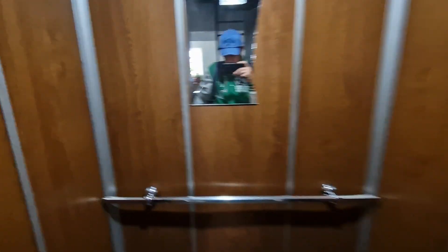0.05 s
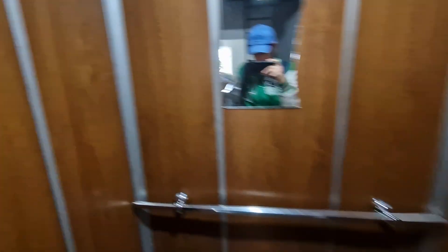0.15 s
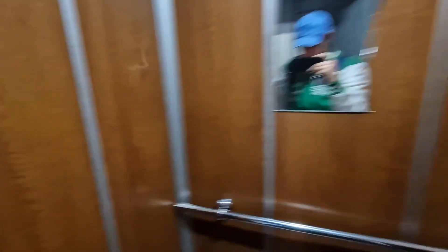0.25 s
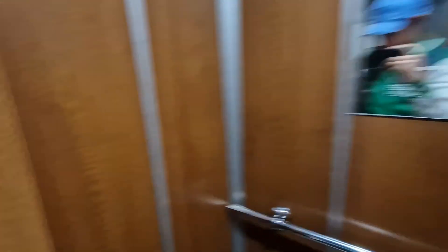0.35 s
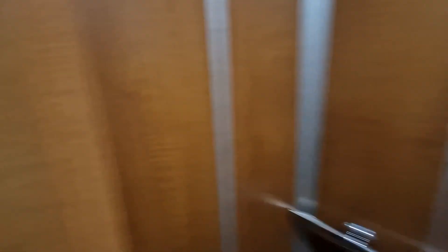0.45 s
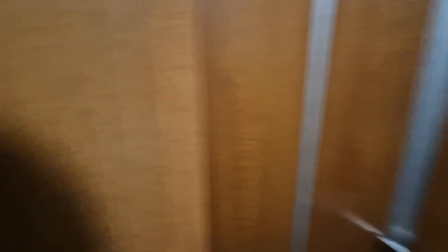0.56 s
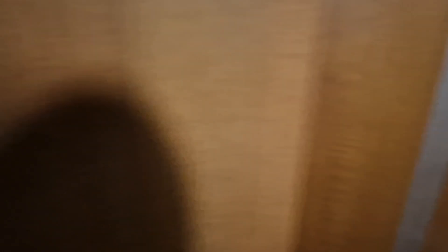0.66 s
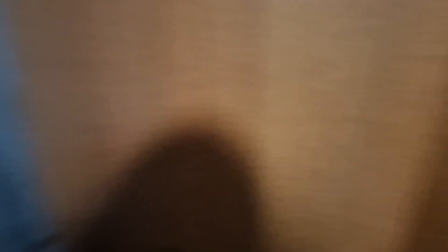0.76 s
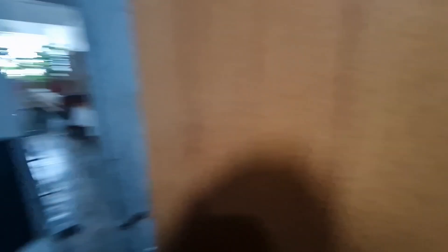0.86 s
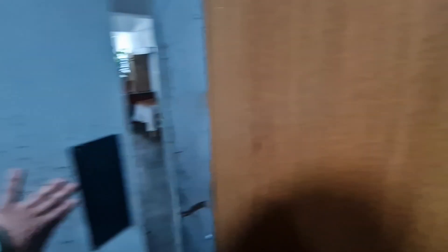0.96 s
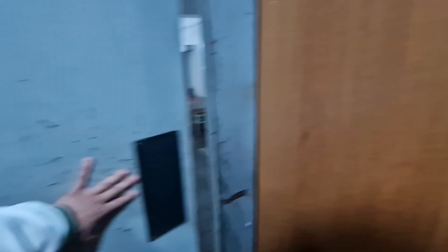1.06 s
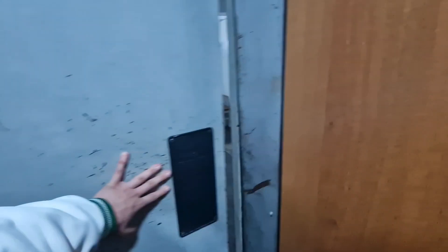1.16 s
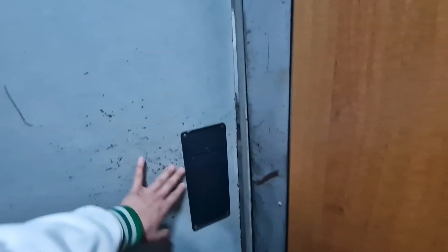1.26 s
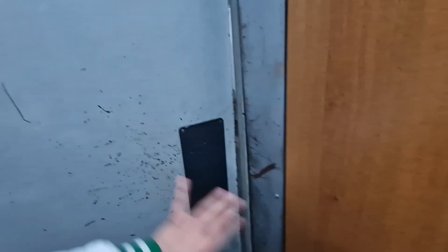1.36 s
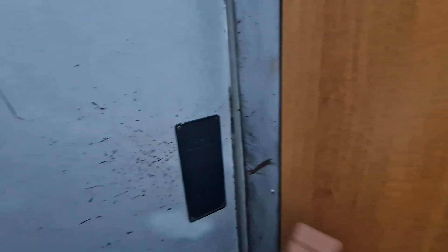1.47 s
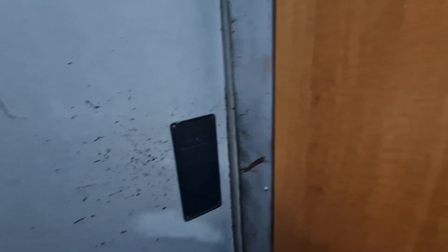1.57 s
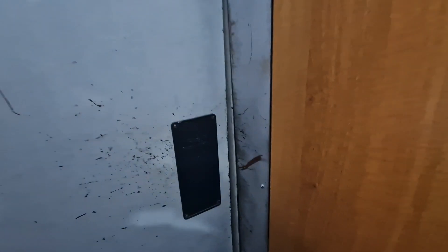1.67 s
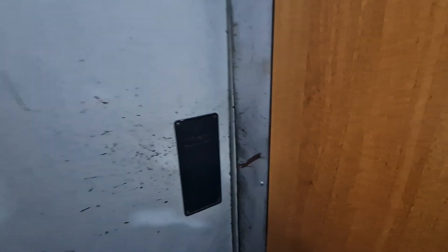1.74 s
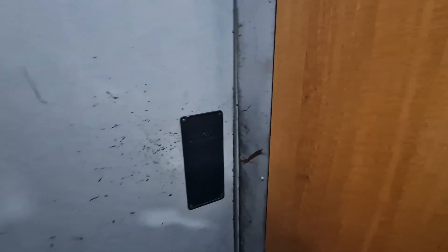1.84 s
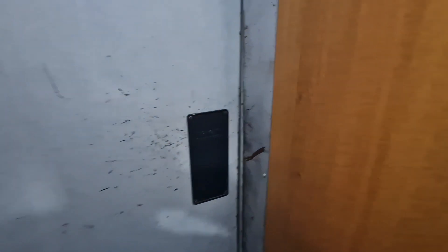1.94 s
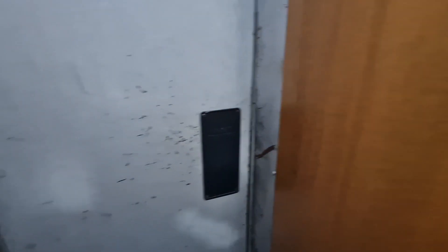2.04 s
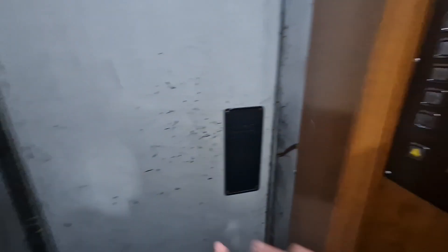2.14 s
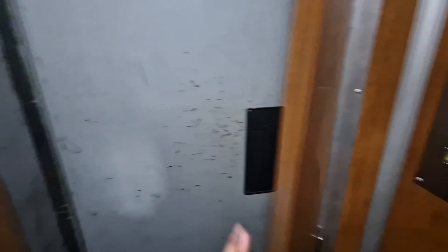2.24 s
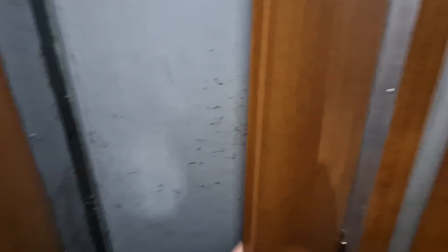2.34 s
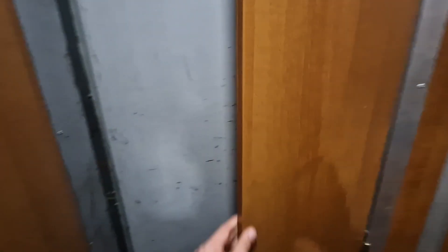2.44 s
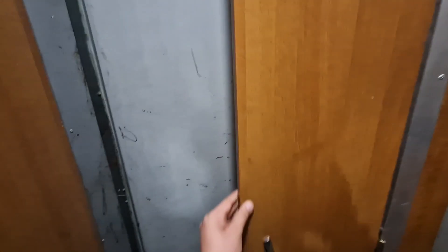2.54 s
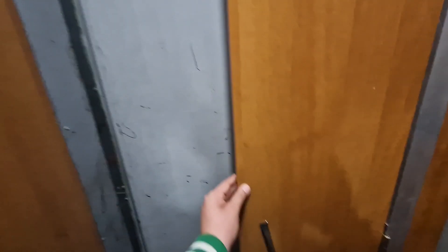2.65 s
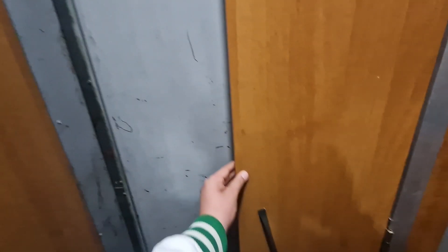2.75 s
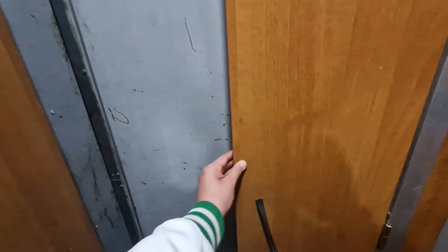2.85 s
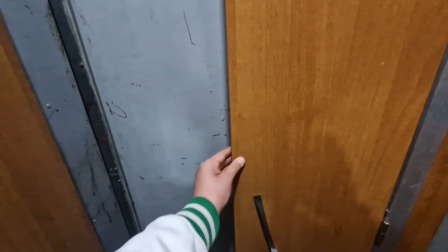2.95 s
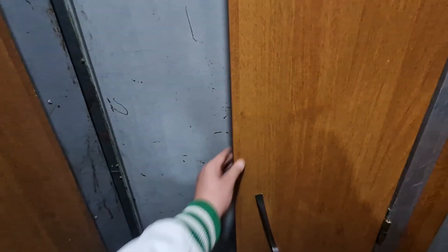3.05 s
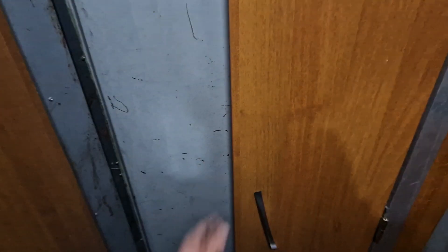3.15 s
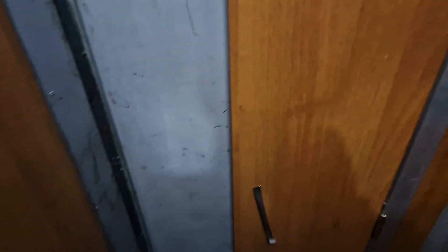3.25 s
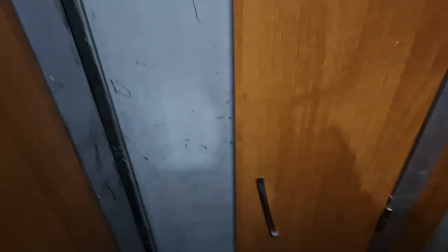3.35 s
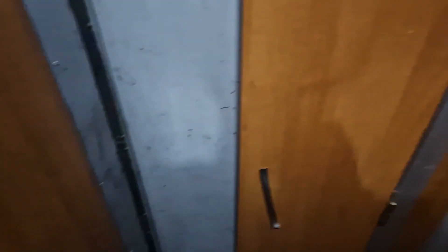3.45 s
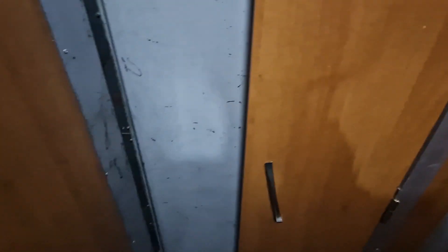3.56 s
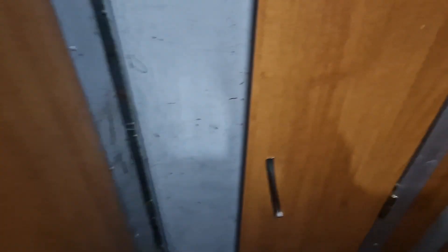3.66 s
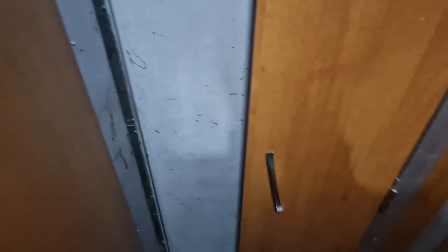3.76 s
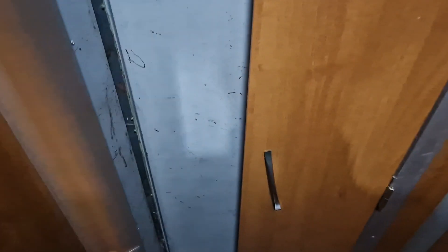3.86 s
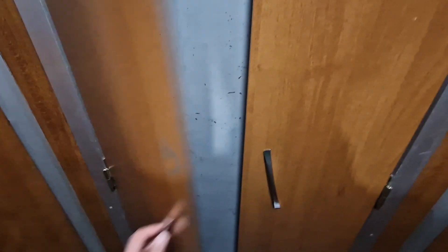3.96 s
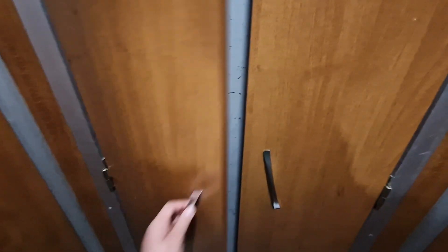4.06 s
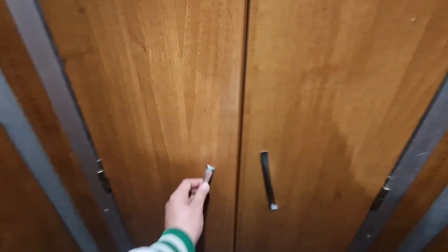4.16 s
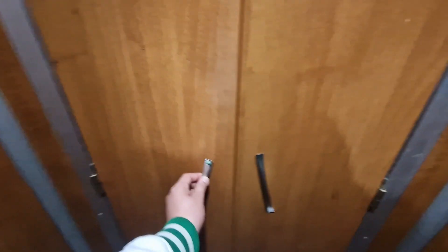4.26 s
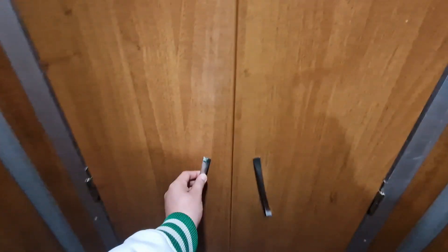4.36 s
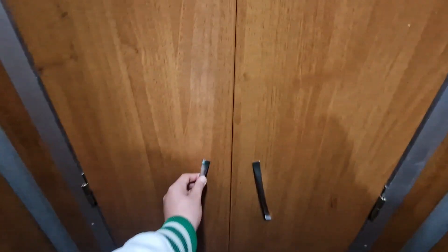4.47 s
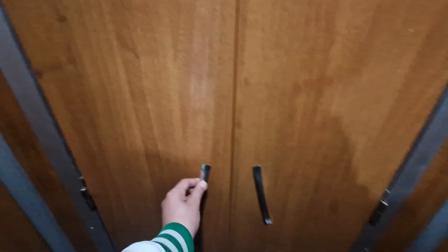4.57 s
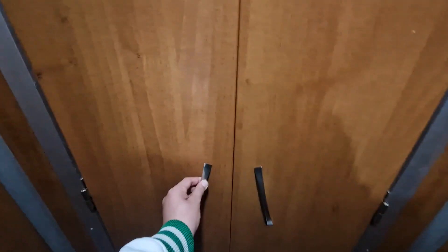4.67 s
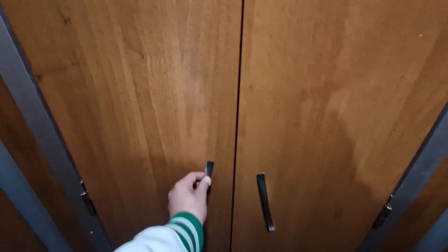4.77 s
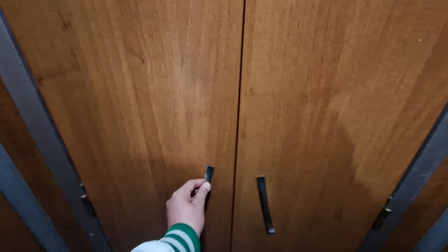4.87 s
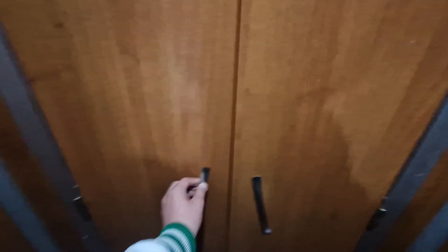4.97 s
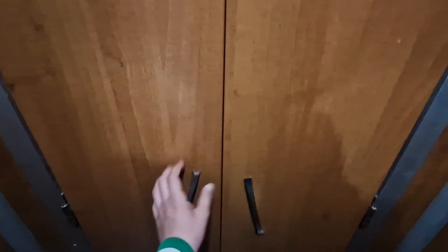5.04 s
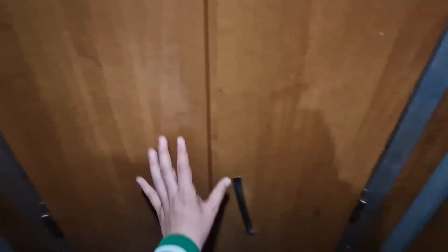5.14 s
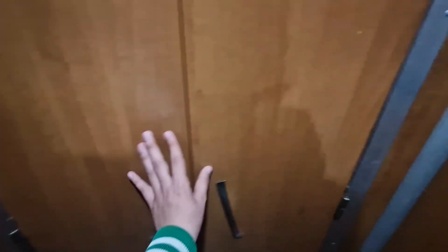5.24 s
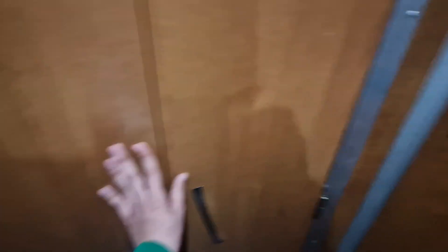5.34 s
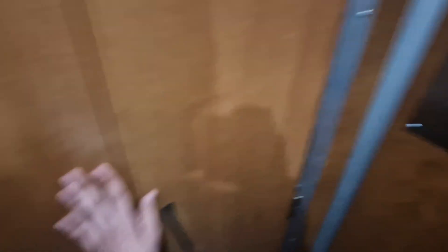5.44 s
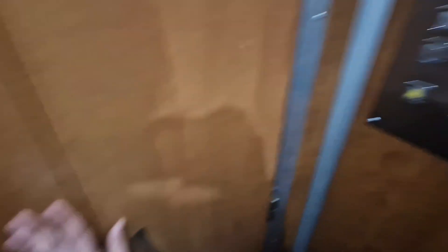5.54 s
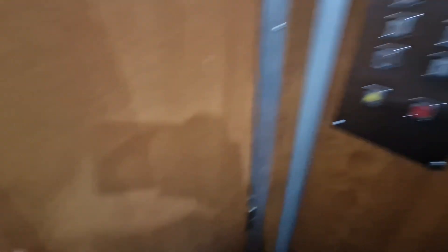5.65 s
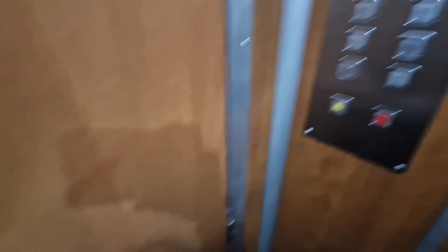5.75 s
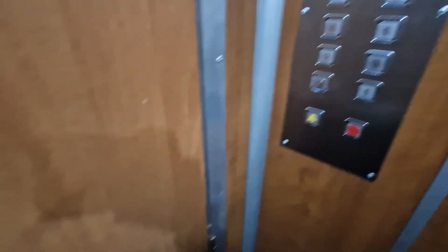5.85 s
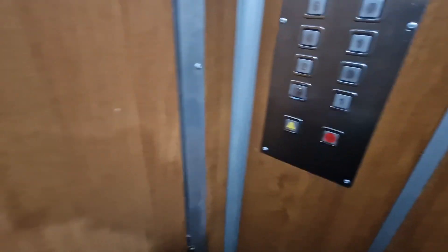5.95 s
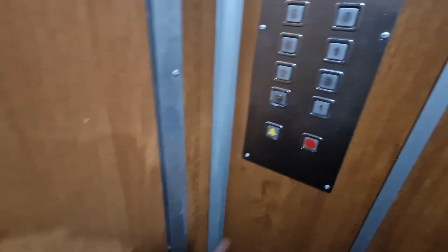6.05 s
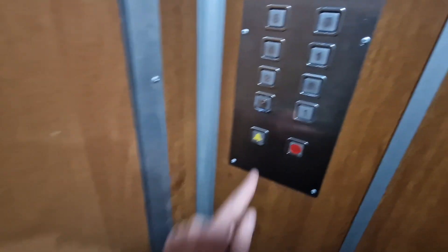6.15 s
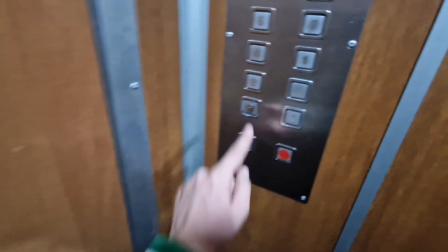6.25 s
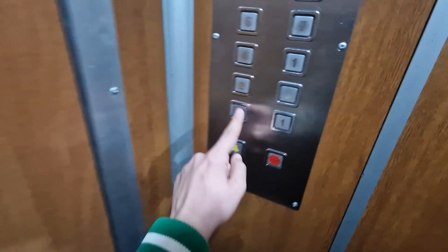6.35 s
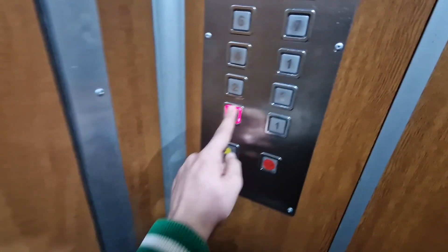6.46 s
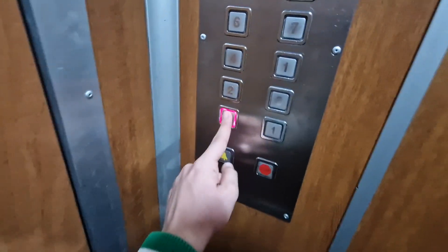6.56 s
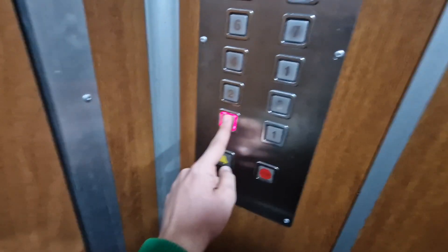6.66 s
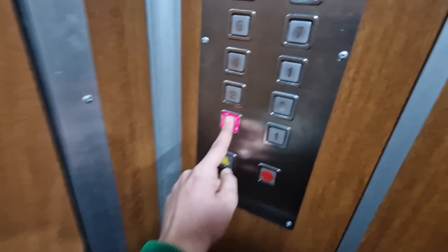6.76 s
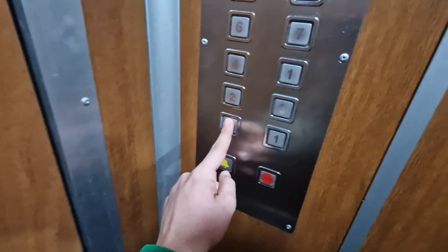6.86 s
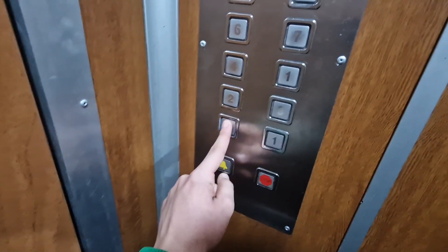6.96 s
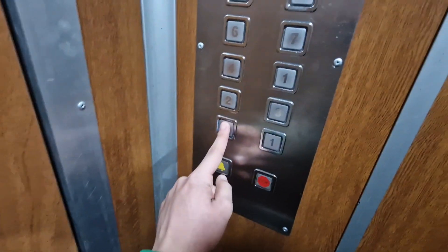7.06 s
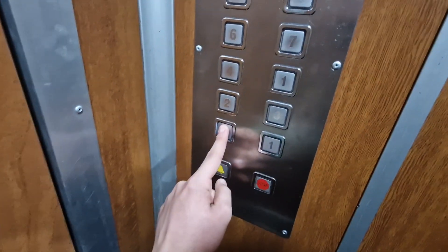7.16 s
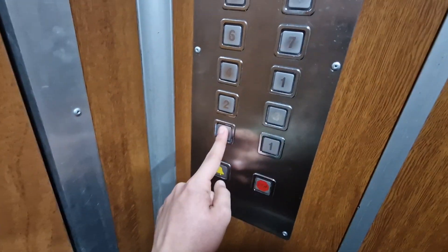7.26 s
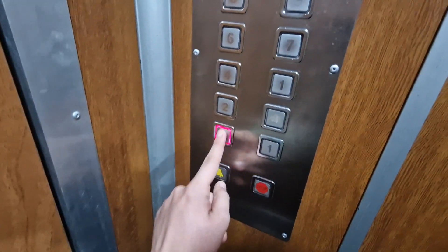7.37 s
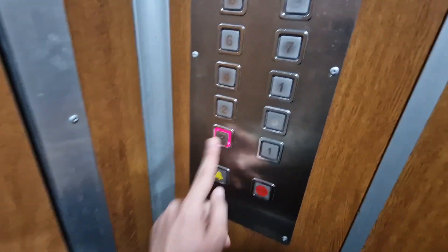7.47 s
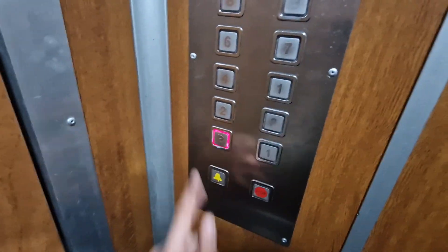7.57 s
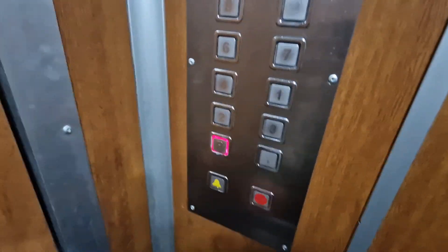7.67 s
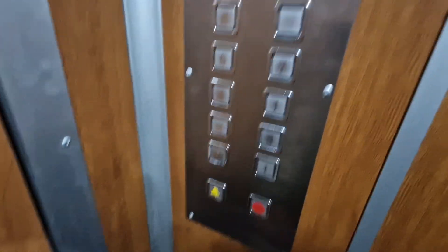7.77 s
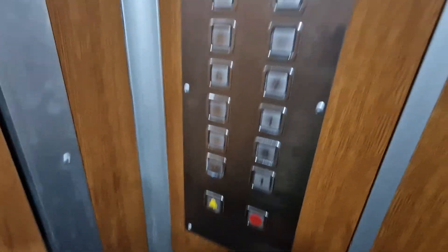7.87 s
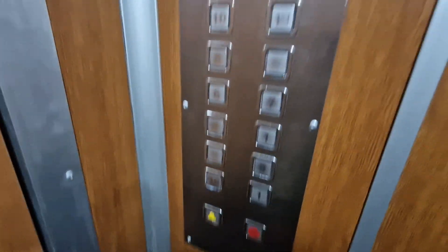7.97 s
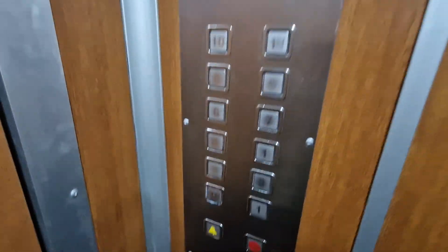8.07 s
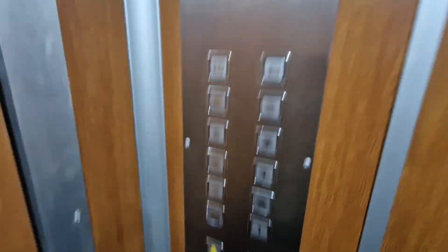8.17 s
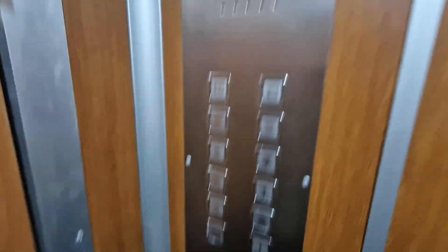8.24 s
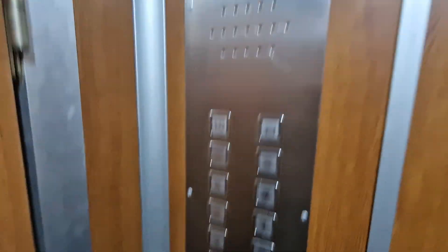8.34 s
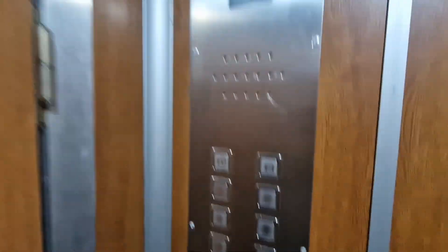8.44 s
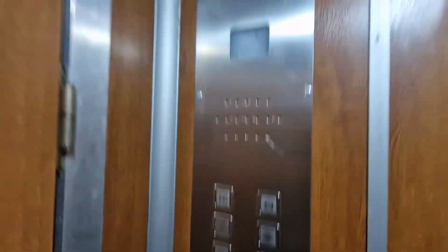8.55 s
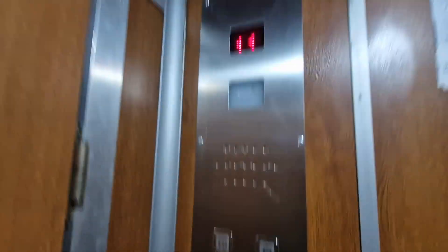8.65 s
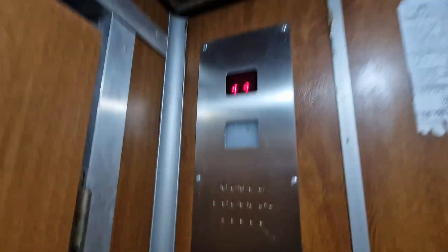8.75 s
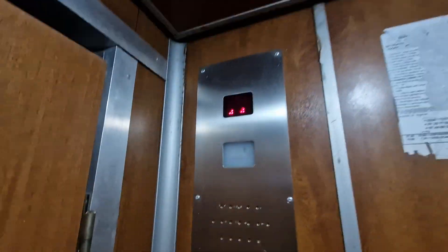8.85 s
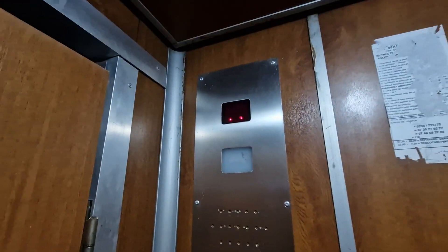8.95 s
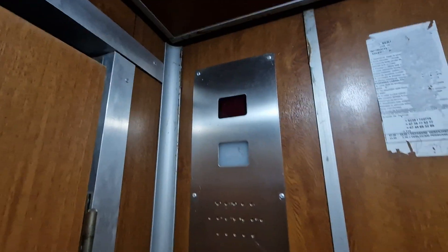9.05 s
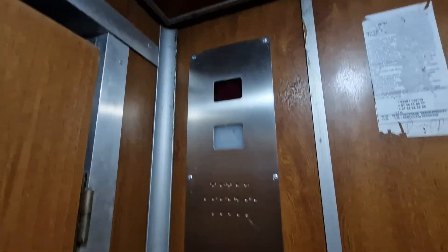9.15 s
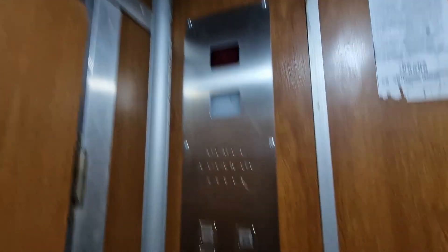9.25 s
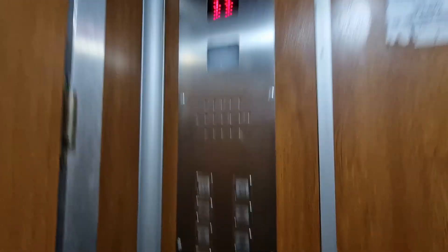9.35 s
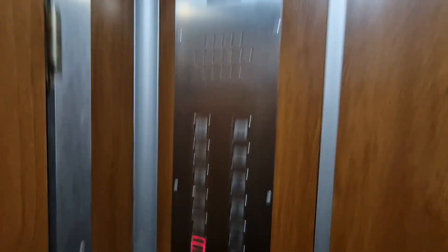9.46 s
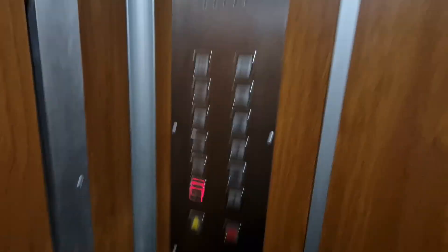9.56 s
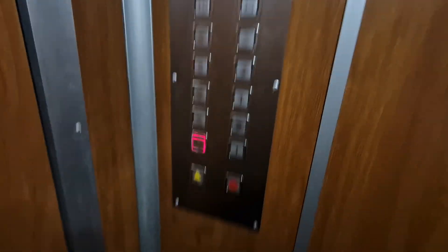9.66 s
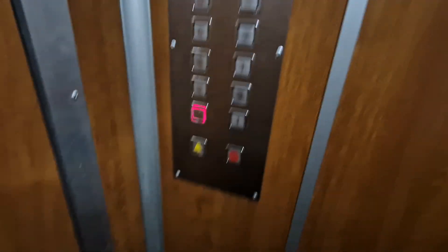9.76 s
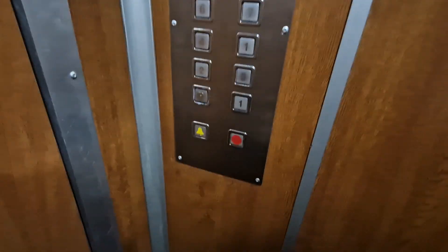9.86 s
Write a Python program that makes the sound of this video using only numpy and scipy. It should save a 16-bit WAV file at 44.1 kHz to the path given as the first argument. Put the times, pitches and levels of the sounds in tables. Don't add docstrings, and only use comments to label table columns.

```python
import sys
import numpy as np
from scipy import signal
from scipy.fft import rfft, irfft, next_fast_len
from scipy.io import wavfile
from scipy.ndimage import uniform_filter1d

SR = 44100
rng = np.random.default_rng(int(sys.argv[2]) if len(sys.argv) > 2 else 0)


def elevation(decibels):
    levels = np.asarray(decibels, float)
    return 10 ** (levels / 20)


def wrap_up_sound(samples):
    columns = np.atleast_2d(samples).T
    tamed = np.clip(columns, -1, 1)
    steps = np.round(tamed * 32767).astype(np.int16)
    wavfile.write(sys.argv[1], SR, steps)


N = 437031

# start_s, peak_db, ringing_hz, hardness_db
LANDING_CLACKS = [(0.2728, -34.5, 2340, -35), (0.4614, -36.5, 2230, -19), (0.13, -37, 2300, -10),
                  (0.352, -41, 2300, -8), (0.576, -37, 5000, -9), (0.619, -37, 1360, -14),
                  (0.7886, -33.5, 2710, -24), (1.0999, -27.5, 2090, -19), (1.7577, -30.5, 2160, -15.5),
                  (1.9152, -38, 2400, -44), (2.2875, -41, 1400, -50), (2.324, -31.5, 1680, -38),
                  (2.3496, -16, 1280, -21.5)]
# start_s, peak_db, ringing_hz, hardness_db
RIGHT_LEAF_CLACKS = [(2.583, -32.5, 2290, -56.5), (2.704, -8, 6000, -21.5), (2.739, -14, 2260, -8),
                     (2.7851, -10, 2060, -17), (2.8236, -3.5, 4650, -10), (2.9472, -28, 2110, -18),
                     (3.0629, -27, 2060, -38), (3.2175, -32, 1170, -42), (3.3538, -36.5, 1700, -21),
                     (3.4865, -34.5, 2540, -58), (3.5724, -32, 1000, -25), (3.7643, -35, 4520, -26),
                     (3.8776, -41, 2930, -49)]
# start_s, peak_db, ringing_hz, hardness_db
LEFT_LEAF_CLACKS = [(4.2946, -35, 1010, -35), (4.4233, -12, 1070, -58.5), (4.4887, -18.5, 1550, -9.5),
                    (4.5778, -26, 5500, -21), (4.6866, -28, 1570, -10.5), (4.7254, 0, 3230, -9.5),
                    (4.8504, -14.5, 2080, -12), (4.8993, -17, 2400, -20), (4.9924, -21, 5130, -14),
                    (5.0956, -26, 5500, -13.5), (5.1499, -34, 5300, -23), (5.2613, -28.5, 5340, -17.5),
                    (5.3143, -36, 3040, -20), (5.3575, -8, 4870, -9), (5.474, -32.5, 2270, -15),
                    (5.5036, -25, 2200, -21), (5.5765, -23.5, 4900, -18), (5.566, -36, 4500, -14)]
# start_s, peak_db, ringing_hz, hardness_db
RIDE_CLACKS = [(5.999, -43, 2370, -22), (6.4226, -29.5, 2400, -28), (6.4896, -43, 1530, -31.5),
               (7.2779, -17.5, 2230, -24), (7.3307, -13.5, 1300, -22.5), (7.3614, -12.5, 3760, -11.5),
               (7.5772, -31, 1070, -55), (7.9497, -39, 1040, -61), (8.208, -38, 730, -60),
               (8.379, -33.5, 1530, -48), (8.8119, -25, 2640, -24), (8.9294, -45, 1470, -12),
               (9.0594, -37, 1680, -20), (9.1284, -38, 4990, -22), (9.3841, -34.5, 1530, -20.5),
               (9.4444, -38, 5390, -21), (9.8062, -34.5, 1650, -26)]
# start_s, peak_db, ringing_hz, hardness_db
MORE_CLACKS = [
    (2.6582, -39.5, 2250, -36),
    (2.9152, -31, 2180, -29.5),
    (4.4352, -16, 4010, -26),
    (4.716, -21.5, 2400, -15),
    (5.0033, -15.5, 5160, -11.5),
    (5.6874, -47, 2000, -28),
]
# frequency_hz, density_db_per_hz
METAL = [(410, -26.5), (700, -25.5), (911, -10.5), (1250, -7), (1810, -5.5), (2010, -4.5), (2720, -9),
         (2940, -7), (3880, -8), (4670, -6), (7810, -11), (8910, -25), (13100, -15), (15700, -18),
         (16100, -55)]
# frequency_hz, width_hz, level_db
FITTINGS = [(883, 46, 1), (1070, 49, -2.5), (1425, 91, 0.5), (1570, 96, 2), (2060, 84, -3.5), (2287, 61, 1),
            (3000, 100, -5.5), (4700, 54, -1.5), (5000, 50, -9), (5360, 86, -4.5), (6896, 150, -8.5)]
# frequency_hz, t60_s
CABIN_T60 = [(100, 0.61), (500, 0.24), (2000, 0.23), (6000, 0.24), (15000, 0.175)]


def clack(db, hz, hard_db):
    octaves = np.log2(hz / 1000)
    wood_db = -10.5 - 4.5 * octaves - 0.18 * db
    t60 = 0.26 - 0.021 * octaves
    t = np.arange(12288) / SR
    f, frame_t, z = signal.stft(ports(len(t)), SR, nperseg=256)
    decay = np.clip(t60, 0.03, 0.8) * read(CABIN_T60, f)[:, None] / 0.27
    tail = signal.istft(z * elevation(-60 * frame_t / decay), SR, nperseg=256)[1][:, :len(t)]
    build = 1 - np.exp(-(t / 0.0023) ** 2)
    strike = tail * build * (1 + np.exp(-t / 0.0028))
    chatter = evened(uniform_filter1d(rng.standard_normal(len(t)), size=220))
    strike = strike * elevation(2.5 * chatter)
    metal = colour(strike, METAL)
    ring = modes(strike, [(hz, 350, 0)])
    fittings = modes(strike, FITTINGS, rng.uniform(0.24, 1.8, len(FITTINGS)))
    wood = evened(resonate(resonate(strike, 620, 700), 620, 1100))
    bright = evened(tilt(metal + 0.23 * fittings, hard_db + 17))
    bright = bright + 0.27 * brighter(ring, -25)
    fade = np.minimum(1, (t[-1] - t) / 0.08)
    return elevation(db + 1) * fade * (bright + elevation(wood_db) * brighter(wood, -25)) / abs(bright).max()


# start_s, peak_db, centre_hz, width_hz
TICKS = [(2.2545, -32, 2500, 4000), (3.4865, -36, 2600, 1500), (3.2175, -36, 2500, 2000),
         (2.7055, -13, 5500, 5040), (2.7864, -16.5, 6500, 3000), (2.8237, -6, 6000, 6090),
         (2.838, -11, 5000, 5990), (4.4255, -15.5, 1600, 2500), (4.431, -16.5, 1800, 2494),
         (4.4886, -21, 7300, 3000), (4.5774, -23, 6500, 4000), (4.7277, -9, 7500, 6020),
         (4.733, -3, 12000, 5940), (4.8505, -13.5, 6800, 2506), (4.8995, -16.5, 7200, 2210),
         (5.0031, -18, 6000, 5000), (5.3586, -5.5, 5000, 3995), (5.4745, -30, 5500, 4000),
         (5.5034, -19, 7000, 3000), (5.5775, -18, 5500, 3000), (8.8124, -29, 6000, 5000)]


def tick(db, hz, width):
    t = np.arange(1024) / SR
    contact_s = 0.0013
    burst = ports(len(t)) * (t / contact_s) * np.exp(-t / contact_s)
    narrow = evened(resonate(resonate(burst, hz, width), hz, width))
    snap = brighter(narrow, -8 * (hz < 8000))
    snap = snap + 0.5 * (hz / 7000) ** 2 * colour(burst, METAL)
    return elevation(db) * snap / abs(snap).max()


# start_s, peak_db, boom_hz, upper_panel_share_db
THUDS = [(0.103, -15, 66, -9.5), (0.606, -17, 76.3, -19), (1.06, -21, 89.5, -6.5), (1.107, -10, 72, -8),
         (1.165, -19, 90, -9), (1.769, -15.5, 76, -16), (2.346, -20.5, 59, -15.5), (2.544, -30, 57.7, -8),
         (2.826, -13, 61.9, -2), (2.915, -16, 75, -8), (3.02, -16, 78.7, -10.5), (3.594, -16, 73.7, -3.5),
         (3.644, -21, 98.2, -9), (3.906, -28, 59, -25.5), (4.297, -29, 60.2, -15.5),
         (4.433, -9.5, 84, -4.5), (4.685, -21.5, 110, 1), (4.732, -5.5, 119, -1.5), (4.768, -14, 170, -8),
         (4.805, -14, 80, -6), (4.92, -19, 90, -6), (4.999, -15, 50, -2.5), (5.357, -11.5, 50.9, -2),
         (6.023, -25.5, 51.8, -33), (6.429, -34, 101.5, -5), (7.103, -16, 104.2, -18),
         (7.294, -7.5, 79.7, -13), (7.384, -11, 124.6, -8.5), (7.459, -11, 52.4, -16),
         (7.568, -10, 59.7, -30), (8.439, -21, 84, -11)]
# frequency_hz, width_hz, level_db
PANELS = [(192.7, 30, -3.5), (258, 26, -8.5), (352.2, 34, -2), (424, 24, -4), (215.4, 12, -14),
          (600, 56, -17)]


def thud(db, hz, upper_db):
    t = np.arange(32768) / SR
    t60 = 0.45 - 0.01 * db
    fall = elevation(-60 * t / np.clip(t60, 0.05, 1.5)) * (1 - np.exp(-t / 0.005)) * (1 - t / t[-1])
    push = ports(len(t))
    boom = np.sin(2 * np.pi * hz * t) * (0.45 + 0.95 * np.exp(-t / 0.035))
    boom = boom + 0.5 * modes(push, [(hz * 1.24, 60, 0), (113, 25, -10)])
    knock = modes(push, PANELS, rng.uniform(0.87, 0.89, len(PANELS))) * elevation(-90 * t)
    return elevation(db - 6.5) * fall * (boom + elevation(upper_db + 0.5) * knock)


# start_s, length_s, pitch_hz, level_db
BARS = [(1.005, 0.06, 1860, -47), (2.35, 0.18, 246, -47), (2.705, 0.019, 6170, -24),
        (2.786, .016, 2040, -19), (3.63, .09, 470, -32), (4.74, 0.29, 193.5, -25.5), (5.505, .04, 880, -43),
        (5.575, .05, 880, -45), (5.305, .03, 880, -48), (5.51, .05, 1030, -48), (7.28, 0.11, 2240, -34),
        (7.28, 0.082, 1496, -34.5), (7.33, 0.092, 5280, -35), (7.36, .05, 7270, -34),
        (7.35, 0.076, 4440, -36), (7.36, 0.045, 3750, -30), (7.375, 0.061, 3300, -30),
        (7.37, 0.071, 6170, -33.5), (7.382, 0.055, 2590, -30), (7.36, .02, 2100, -29),
        (7.36, .05, 5200, -32), (7.33, .025, 3400, -32), (7.28, .05, 3100, -37), (4.43, .1, 200, -28),
        (5.0, .08, 870, -41), (5.0, .06, 360, -32), (9.8, .04, 1650, -54), (8.2, .06, 2150, -55)]
# start_s, length_s, pitch_hz, level_db
SCRAPES = [(2.35, .03, 4800, -30), (2.352, .02, 3100, -32), (2.518, .015, 5600, -50),
           (2.518, .015, 3800, -52), (2.56, .03, 450, -46), (3.158, .02, 2060, -53), (3.33, .012, 980, -48),
           (3.355, .025, 740, -46), (3.49, .03, 700, -47), (3.22, .05, 500, -42), (4.725, .06, 400, -26),
           (4.73, .05, 950, -29), (4.85, .09, 400, -33), (8.29, .04, 900, -49), (8.3, .04, 2100, -53),
           (8.425, .04, 730, -47), (1.91, .04, 2320, -47), (1.95, 0.066, 2250, -46),
           (5.358, .03, 7560, -28), (5.354, 0.035, 1400, -24), (7.365, 0.046, 14760, -28.5),
           (9.8, 0.07, 5330, -49)]
# start_s, length_s, centre_hz, width_hz, level_db
CLATTER = [(0.916, .04, 1300, 900, -44.5), (1.005, 0.088, 1900, 600, -45), (1.1, .07, 2000, 600, -40),
           (1.106, .02, 3400, 300, -42.5), (1.251, 0.054, 1900, 900, -48.5),
           (2.736, .015, 3000, 404, -26.5), (2.742, .03, 800, 300, -33), (2.786, 0.022, 5300, 301, -29),
           (2.824, .03, 4800, 896, -20), (2.826, .04, 1800, 504, -20.5), (2.826, .035, 7400, 897, -25.5),
           (3.575, .14, 340, 30, -30), (2.826, .09, 430, 70, -24), (2.87, .1, 330, 90, -29),
           (2.79, .05, 2000, 250, -25), (5.357, .07, 400, 60, -33), (3.6, .08, 1900, 1200, -40),
           (2.745, .03, 660, 90, -33), (3.582, 0.1, 1000, 200, -44.5), (4.422, .035, 1900, 1606, -23),
           (4.436, .012, 6150, 300, -26.5), (4.438, .025, 4000, 700, -27), (4.445, 0.065, 2300, 499, -31),
           (4.483, 0.054, 6900, 398, -34.5), (4.71, .02, 2300, 1500, -37), (4.726, .03, 3100, 600, -21),
           (4.73, 0.055, 6500, 1195, -22.5), (4.738, .06, 1600, 300, -25.5),
           (4.76, 0.055, 2400, 495, -27.5), (4.855, .05, 2200, 500, -33), (4.898, 0.044, 2300, 500, -33.5),
           (5.002, .05, 1500, 701, -31), (5.355, .06, 4800, 1100, -23), (5.391, .03, 3000, 400, -35.5),
           (5.504, .02, 2250, 350, -39.5), (5.729, 0.036, 3000, 900, -51), (5.809, .07, 4800, 150, -60.5),
           (5.9, .7, 2300, 50, -66), (8.295, .15, 1300, 1100, -45), (9.1, .08, 5300, 250, -52),
           (9.44, .05, 5350, 200, -51)]


def sing(length, hz, width, db, pure=0.0):
    t = np.arange(round(1.3 * length * SR) // 2 * 2) / SR
    fuzz = modes(ports(len(t)), [(hz, width, 0)])
    tone = evened(fuzz + pure * np.sin(2 * np.pi * hz * t))
    tone = brighter(tone, -22 * (hz < 8000))
    return elevation(db - 13.7 * (t / length) ** 2) * tone * signal.windows.tukey(len(t), 0.15)


# start_s, level_db, hardness_db
RUBS = [
    [(1.05, -48, -27), (1.11, -48.5, -27), (1.3, -60, -26)],
    [(3.58, -42, -20), (3.648, -35.5, -31), (3.76, -54, -34.5)],
    [(4.645, -58, -15), (4.69, -43, -15), (4.724, -37, -12)],
    [(7.04, -71, -27), (7.082, -57, -40), (7.26, -53.5, -11)],
    [(7.258, -39, -10), (7.292, -25.5, -20.5), (7.42, -32, -14), (7.46, -38.5, -17.5), (7.68, -57.5, -34.5)],
]


def rod(rows):
    level_db, hard_db = stroke(rows)
    size = len(level_db) // 2 * 2 + 2
    grain = np.repeat(elevation(2.4 * rng.standard_normal(size // 128 + 1)), 128)[:size]
    slips = ports(size) * uniform_filter1d(grain, size=64)
    grind = evened(tilt(colour(slips, METAL), hard_db.mean() + 13))
    fittings = modes(slips, FITTINGS, rng.uniform(0.26, 1.6, len(FITTINGS)))
    grind = evened(grind + 0.3 * fittings)
    return grind[:, :len(level_db)] * elevation(level_db - 0.5) * signal.windows.tukey(len(level_db), 0.1)


# start_s, length_s, level_db
SCUFFS = [
    (1.0, .36, -39.5),
    (3.58, .11, -36.5),
    (4.72, .12, -35),
    (7.27, .18, -32),
    (7.599, .4, -51.5),
    (8.222, .3, -48),
    (9.1, .4, -50.5),
]


def scuff(length, db):
    size = round(length * SR) // 2 * 2
    flutter = elevation(3.5 * evened(uniform_filter1d(rng.standard_normal(size), size=700)))
    rub = ports(size) * flutter
    low = evened(resonate(resonate(rub, 600, 450), 600, 900))
    high = evened(resonate(resonate(rub, 1400, 1600), 1500, 3000))
    rub = evened(low + 0.4 * high)
    return elevation(db) * brighter(rub, -30) * np.sin(np.pi * (np.arange(size) / size) ** 0.6)


# start_s, resonance_hz, level_db
SWING = [(0.15, 290, -43.5), (0.658, 370, -34), (0.686, 376, -56), (0.882, 361, -34), (0.996, 344, -57),
         (1.05, 330, -38)]


def swing():
    hz, db = stroke(SWING)
    push = ports(len(hz))
    groan = resonate(resonate(push, hz, 105), hz, 220)
    return elevation(db - 3.5) * evened(groan) * signal.windows.tukey(len(hz), 0.2)


# start_s, pitch_hz, level_db
GROAN = [(8.006, 433, -55), (8.022, 437, -41), (8.05, 461, -42), (8.066, 457, -34), (8.08, 454, -37.5),
         (8.148, 455, -39), (8.172, 451, -51), (8.24, 456, -52)]
# start_s, pitch_hz, level_db
SQUEAL = [(7.48, 7250, -51), (7.496, 7230, -38.5), (7.548, 7250, -51), (7.576, 7150, -48.5),
          (7.8, 7320, -77)]


def shoe(rows, width, pure):
    hz, db = stroke(rows)
    fuzz = evened(resonate(resonate(ports(len(hz)), hz, width), hz, width))
    tone = pure * np.sin(2 * np.pi * np.cumsum(hz) / SR) + 0.4 * fuzz
    return elevation(db) * evened(tone) * signal.windows.tukey(len(hz), 0.15)


# start_s, pitch_hz, level_db
MOTOR = [(7.501, 58.8, -25.5), (7.66, 55.63, -27), (7.76, 48.9, -25.5), (8.04, 48.2, -33.5),
         (8.14, 53.3, -38), (8.64, 53.22, -29.5), (8.78, 50.25, -30.5), (9.82, 51.2, -33.5),
         (9.91, 50.8, -43)]


def motor():
    hz, db = stroke(MOTOR)
    waver = rng.standard_normal(len(hz))
    waver = evened(uniform_filter1d(uniform_filter1d(waver, 2500), 2500))
    turn = 2 * np.pi * np.cumsum(hz * (1 + 0.06 * waver)) / SR
    tone = np.sqrt(2) * (np.sin(turn) + elevation(-5) * np.sin(2 * turn + 0.84))
    return np.ones((2, 1)) * elevation(db - 2.1) * tone * signal.windows.tukey(len(hz), 0.04)


# start_s, level_db
SWAY = [(0.0, -60), (0.2, -42), (0.5, -37.5), (1.0, -40.5), (1.9, -42.5), (2.3, -48), (2.66, -55),
        (3.3, -42.5), (4.2, -51), (4.4, -51.5), (5.85, -35), (6.0, -43.5), (6.4, -44.5), (7.04, -57),
        (7.14, -34), (8.04, -36), (8.4, -31), (9.91, -28)]
# start_s, level_db, cloth_nearness_db, leaf_looseness_db
RUSTLE = [(0.0, -48, 11.5, -5.5), (1.0, -51.5, 11, 8), (1.45, -54.5, 11, 7.5), (1.7, -48.5, 18, -3),
          (2.2, -57.5, 5.5, 1), (3.1, -58.5, -10.5, 11), (3.38, -54, 20.5, 6), (3.47, -63, -3.5, 8),
          (4.12, -60, -4, -4), (4.38, -67, -2, -4), (5.75, -56.5, 2, 7.5), (5.979, -62.5, 9.5, -8),
          (6.4, -58.5, 11.5, -11), (6.8, -84.5, 1, -10), (7.03, -83, 1, -1), (7.1, -56, -9, 2),
          (8.039, -59, -17, 12), (8.4, -50.5, -20, -5), (9.91, -52, 5, 3)]
# frequency_hz, width_hz, level_db
BOOM = [(49.7, 14, 8.5), (92.9, 9.8, 1.5), (76.6, 4.3, -4), (130.3, 60, -24), (32.7, 17, -0.5)]
# frequency_hz, density_db_per_hz
BODY = [(71, -26), (120, -5), (156, -17), (199, -12), (239, -15), (301, -10), (405, -13.5), (611, -21),
        (1500, -28.5), (1950, -61.5), (3300, -120)]
# frequency_hz, density_db_per_hz
HISS = [(290, -27.5), (500, -4), (604, -4), (679, -8.5), (1270, -8.5), (1910, -9), (2180, -7.5),
        (3430, -14), (5310, -13), (5970, -16.5), (7430, -20.5), (9110, -44), (12400, -40), (15200, -38.5),
        (15950, -52)]
# level_below_peak_db, build_up_s, t60_s
AFTER_BOOM = (-18.5, 0.051, 1.76)
AFTER_PANELS = (-20.5, 0.044, 1.055)
AFTER_SHAFT = (-29, 0.011, 0.57)


def sway():
    t = np.arange(N) / SR
    s, sway_db = np.transpose(SWAY)
    sway_db = np.interp(t, s, sway_db)
    s, *columns = np.transpose(RUSTLE)
    hiss_db, bright_db, loose_db = (np.interp(t, s, c) for c in columns)
    panel_blows = [(s, db + upper_db / 2) for s, db, hz, upper_db in THUDS]
    clacks = LANDING_CLACKS + RIGHT_LEAF_CLACKS + LEFT_LEAF_CLACKS + RIDE_CLACKS
    boom_gain = np.sqrt(elevation(2 * sway_db) + after(THUDS, *AFTER_BOOM))
    body_gain = np.sqrt(elevation(2 * (hiss_db + loose_db)) + after(panel_blows, *AFTER_PANELS))
    shaft_gain = np.sqrt(after(clacks, *AFTER_SHAFT))
    size = next_fast_len(N)
    boom = evened(np.tanh(0.64 * modes(ports(size)[:, :N], BOOM)))
    boom = evened(signal.sosfilt(signal.butter(1, 260, fs=SR, output="sos"), boom))
    body = colour(ports(size), BODY)[:, :N]
    body = body + 0.45 * modes(body, PANELS)
    hiss = colour(ports(size), HISS)[:, :N]
    hiss = brighter(hiss, bright_db + 20 * np.log10(flicker(900, depth_db=3)))
    shaft = colour(ports(size), HISS)[:, :N]
    body = body_gain * body * flicker(900, depth_db=2.5)
    hiss = elevation(hiss_db + 1.5) * hiss * flicker(4000, depth_db=1.1)
    return boom_gain * boom + body + (hiss + shaft_gain * shaft) * flicker(500, depth_db=1)


def after(blows, below_db, rise, t60):
    t = np.arange(0, N + 256, 256) / SR
    since = np.maximum(t - np.array([row[0] for row in blows])[:, None], 0)
    peak = elevation(np.array([row[1] for row in blows])[:, None] + below_db)
    power = ((peak * elevation(-60 * since / t60)) ** 2 * (1 - np.exp(-since / rise))).sum(0)
    return np.interp(np.arange(N) / SR, t, power)


# frequency_hz, left_right_likeness
SAME = [(30, 0.98), (70, 0.99), (300, 0.84), (800, 0.45), (3000, 0.16), (15000, 0.1)]
PORT_LAG = 17


def ports(length):
    a, b = rfft(rng.standard_normal((2, length)))
    hz = np.fft.rfftfreq(length, 1 / SR)
    same = np.clip(read(SAME, hz), 0, 1)
    late = np.exp(-2j * np.pi * hz * PORT_LAG / SR * hz ** 2 / (hz ** 2 + 630 ** 2))
    right = (same * a + np.sqrt(1 - same ** 2) * b) * late
    return irfft([a * elevation(0.46), right], length)


def resonate(x, hz, width):
    turn = np.exp(2j * np.pi * np.cumsum(hz * np.ones(x.shape[-1])) / SR)
    r = np.exp(-np.pi * abs(width) / SR)
    return 2 * (turn * signal.lfilter([1 - r], [1, -r], x / turn)).real


def modes(x, table, weights=1):
    weights = np.ones(len(table)) * weights
    total = 0
    for g, (hz, w, db) in zip(weights, table):
        total = total + g * elevation(db) * resonate(resonate(x, hz, w), hz, 3 * w) / np.sqrt(w)
    return evened(total)


def colour(x, points):
    hz = np.fft.rfftfreq(x.shape[1], 1 / SR)
    return evened(irfft(rfft(x) * elevation(read(points, hz)), x.shape[1]))


def tilt(x, hard_db):
    hz = np.fft.rfftfreq(x.shape[1], 1 / SR)
    return irfft(rfft(x) * elevation(hard_db * np.clip((hz - 1500) / 8200, 0, 1)), x.shape[1])


def brighter(x, db):
    top = signal.sosfiltfilt(signal.butter(4, 8300, "high", fs=SR, output="sos"), x)
    return x + (elevation(db) - 1) * top


def flicker(width, depth_db):
    wander = uniform_filter1d(uniform_filter1d(rng.standard_normal(N), width), width)
    return elevation(depth_db * evened(wander))


def evened(x):
    return x / np.sqrt(np.mean(x ** 2) + 1e-20)


def read(points, hz):
    f, value = np.transpose(points)
    return np.interp(np.log(hz + 1), np.log(f + 1), value)


def stroke(rows):
    s, *columns = np.transpose(rows)
    t = np.arange(s[0], s[-1], 1 / SR)
    return [np.interp(t, s, c) for c in columns]


def add(mix, s, sound):
    part = mix[:, max(round(s * SR), 0):][:, :sound.shape[1]]
    part += sound[:, :part.shape[1]]


def scene():
    mix = sway()
    for s, *row in LANDING_CLACKS + RIGHT_LEAF_CLACKS + LEFT_LEAF_CLACKS + RIDE_CLACKS + MORE_CLACKS:
        add(mix, s - 0.001, clack(*row))
    for s, *row in TICKS:
        add(mix, s - 0.001, tick(*row))
    for s, *row in THUDS:
        add(mix, s, thud(*row))
    for s, length, hz, db in BARS:
        add(mix, s, sing(length, hz, 1.2 * np.sqrt(hz), db, pure=1.1))
    for s, length, hz, db in SCRAPES:
        add(mix, s, sing(length, hz, 7.5 * np.sqrt(hz), db))
    for s, *row in CLATTER:
        add(mix, s, sing(*row))
    for rows in RUBS:
        add(mix, rows[0][0], rod(rows))
    for s, *row in SCUFFS:
        add(mix, s, scuff(*row))
    add(mix, SWING[0][0], swing())
    add(mix, GROAN[0][0], shoe(GROAN, width=30, pure=1.6))
    add(mix, SQUEAL[0][0], shoe(SQUEAL, width=240, pure=0.15))
    add(mix, MOTOR[0][0], motor())
    return mix


def low_pass(x):
    return signal.sosfilt(signal.butter(12, 16480, fs=SR, output="sos"), x)


def record(dry):
    edge = signal.firwin(255, 16150, window=("kaiser", 5), fs=SR)
    limited = 1.159 * np.tanh(dry)
    mix = signal.oaconvolve(limited, edge[None], "same")
    return low_pass(mix)


dry = scene()
out = record(dry)
wrap_up_sound(out)
```